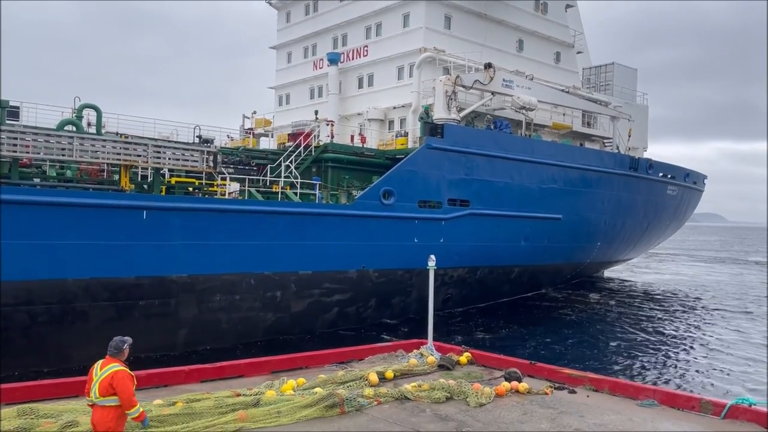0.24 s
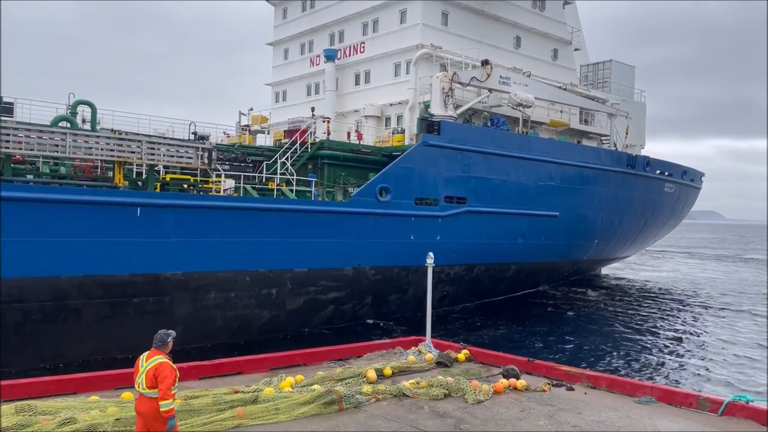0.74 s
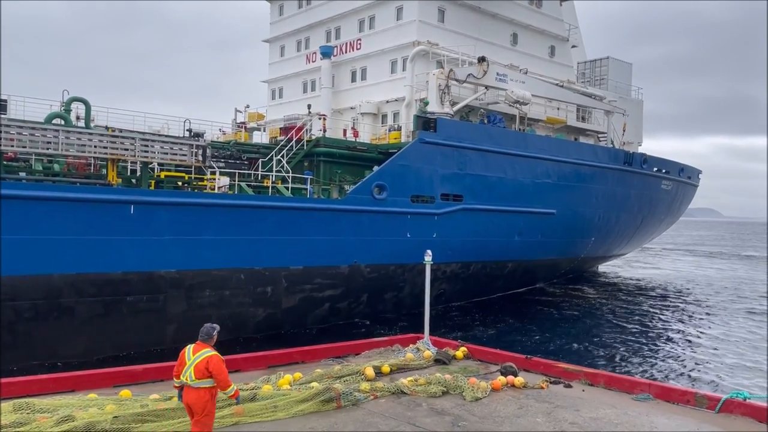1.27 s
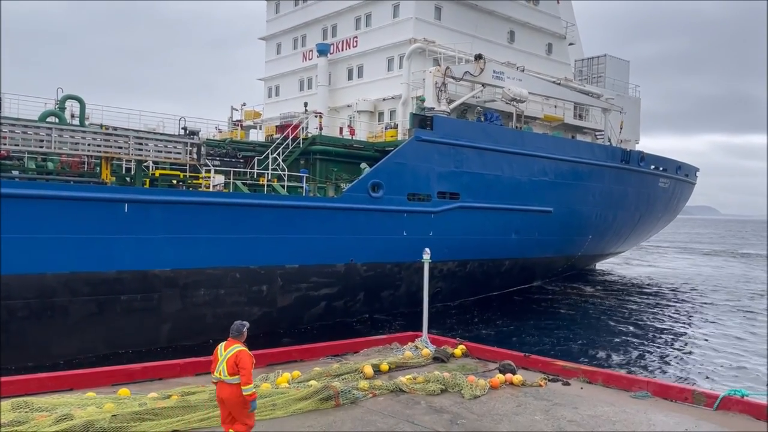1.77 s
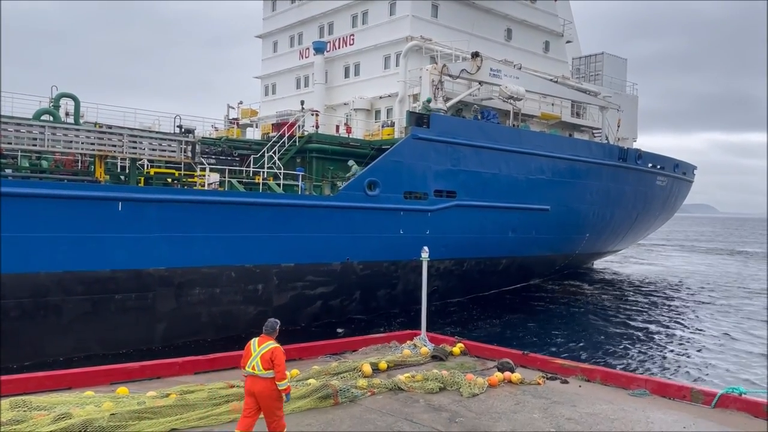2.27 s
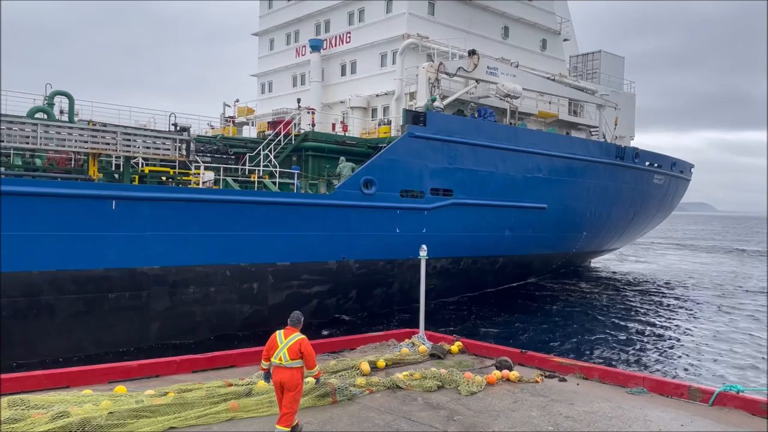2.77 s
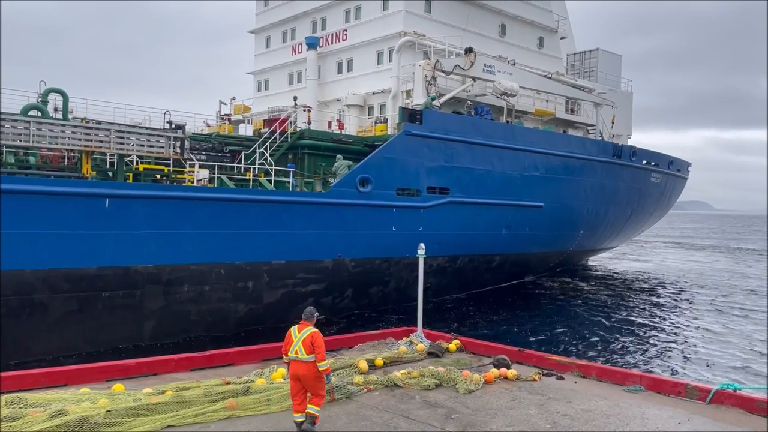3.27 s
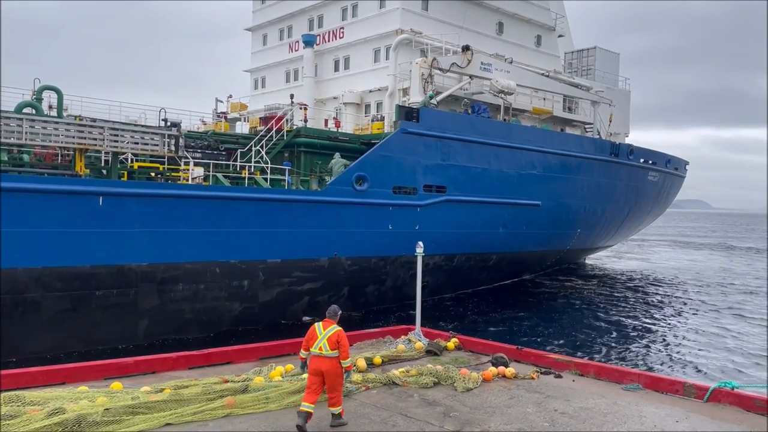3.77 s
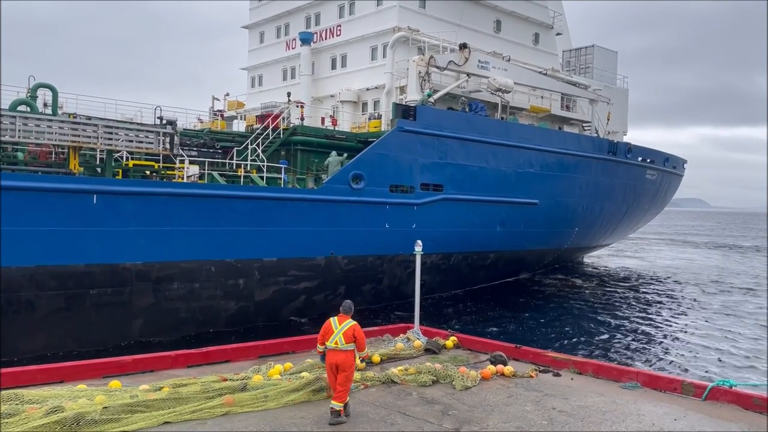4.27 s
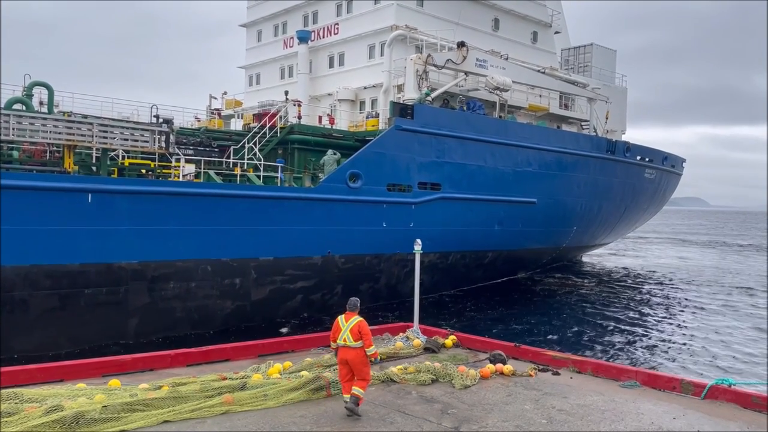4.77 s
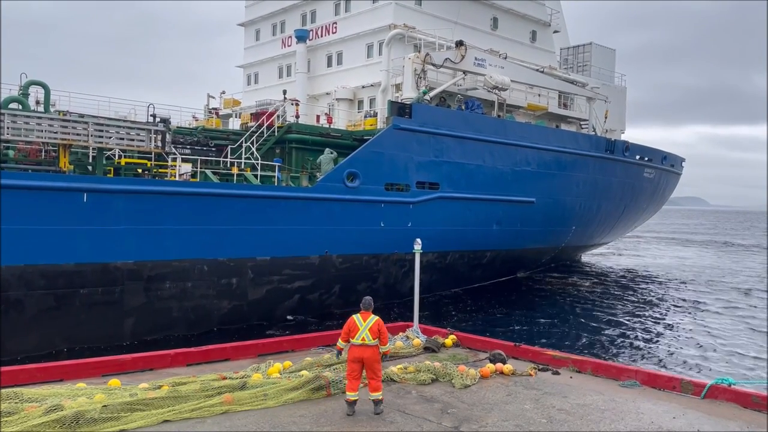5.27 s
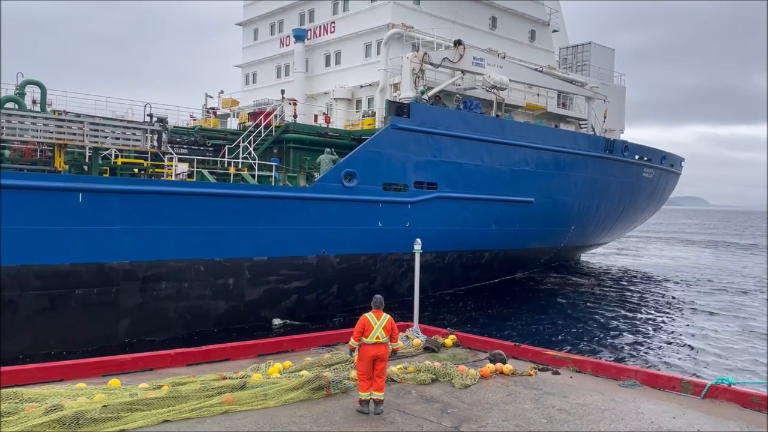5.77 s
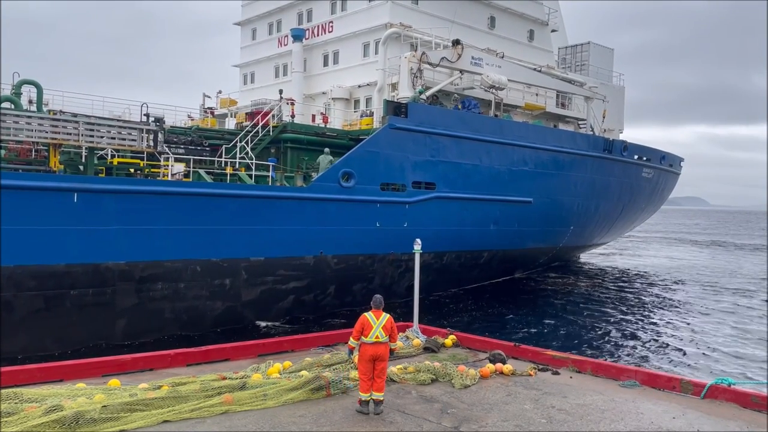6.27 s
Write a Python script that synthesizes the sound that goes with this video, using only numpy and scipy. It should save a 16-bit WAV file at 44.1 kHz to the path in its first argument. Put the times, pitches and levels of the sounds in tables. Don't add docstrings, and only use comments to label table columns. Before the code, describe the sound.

A large moored ship's machinery drones without pause for about 6.5 seconds, heard in stereo from an open concrete wharf. Deep diesel rumble, strongest around 50 to 250 Hz, throbs with rough, uneven puffs and a steady low pump hum near 100 Hz. A hollow exhaust boom around 220 Hz is strong at the start, drops near 0.4, surges around 0.9, sinks deepest at 1.5, recovers by 2 and holds, dips briefly near 4, then surges again at 5.3 and eases at the end. Short irregular lulls make it flutter about four times a second. Steel plates and ducts ring dully in the midrange. Quieter ventilation roar and a faint airy whistle and hiss drift above, lifting slightly around 1 and from 3.4 to 4.1 seconds. Bass is solid and central, highs dim and diffuse. No footsteps or voices.

```python
import sys
import numpy as np
from scipy import signal
from scipy.fft import rfft, irfft, next_fast_len
from scipy.io import wavfile
from scipy.ndimage import uniform_filter1d, map_coordinates

SR = 44100
rng = np.random.default_rng(int(sys.argv[2]) if len(sys.argv) > 2 else 0)


def unload_audio(sound):
    columns = np.transpose(np.atleast_2d(sound))
    steps = np.round(np.clip(columns, -1, 1) * 32767)
    wavfile.write(sys.argv[1], SR, steps.astype(np.int16))


def how_loud(loudness_db):
    steps = np.asarray(loudness_db, float) / 20
    return 10 ** steps


N = 287532
T = np.arange(N) / SR

# time in seconds, level in dB.
BREEZE = [(0, -0.5), (.6, 1), (1.25, 1), (1.8, .5), (2.55, -0.6), (3.4, 1.7), (4.1, 1.6), (4.55, 1),
          (5.4, 1.35), (5.9, 1), (6.52, 0.5)]
BAND_EDGES = (270, 980, 3000, 8200)


def swells(rows, smooth_s):
    curve = np.interp(T, *np.transpose(rows))
    smooth = uniform_filter1d(curve, size=int(smooth_s * SR))
    return smooth - smooth.mean()


def wobble(rate):
    coarse = T[::256]
    points = rng.standard_normal(int(N * rate / SR) + 4)
    return np.interp(T, coarse, map_coordinates(points, [coarse * rate]))


def port_spectrum():
    # frequency in Hz, level in dB per Hz, left-right balance in dB, likeness from 0 to 1,
    # lead of the right port in radians.
    hull_rows = [(25, -66.5, -1, 0.93, 0), (35, -60.5, 4, 0.95, 0.059), (54.3, -49, -0.7, 0.96, 0.071),
                 (80.4, -49.5, 0.6, 0.98, 0.49), (110, -50.5, 0.5, 0.99, 0.13), (145, -54, -2.5, 1, 0),
                 (184, -56, 0.3, 0.93, 0.19), (243, -55.5, -1, 1, 0.22), (337, -64.5, -1, .89, .3),
                 (468, -60.5, -.6, .93, .2), (557, -62, 2.1, 0.9, 0.4), (790, -63, 2.5, .88, 0.98),
                 (888, -63.5, 8.5, 1, 1.4), (961, -64.5, 2, .85, 1.67)]
    fan_rows = [(1080, -65, 4.7, .85, 2.8), (1220, -73.2, .3, .66, 3.5), (1300, -70.6, 1.5, .84, 5.3),
                (1380, -68, -1.5, .93, 6.2), (1500, -70.8, -.3, .8, 6.8), (1600, -71.3, 0, .82, 7.4),
                (1760, -74.5, .7, .7, 7.6), (1890, -74.5, 3.2, .33, 8.8), (1960, -75.2, 2.7, .66, 9.5),
                (2060, -79, 3.3, .54, 9.7), (2220, -78.4, .2, .72, 11.3), (2450, -77, -2.4, .89, 11.7),
                (2750, -81.3, -2, .92, 12.6), (2880, -85, -.5, .82, 12.9)]
    hiss_rows = [(3000, -87.5, 1, .35, 13.4), (3200, -88.5, .5, .55, 16), (3550, -88.5, 0, 0.36, 16.7),
                 (3630, -89.5, 5.5, .11, 15.7), (3760, -87, 1.5, .49, 12.7), (3900, -94, -0.5, .7, 13.1),
                 (4470, -92.5, 2, 0.57, 13.4), (4700, -95, 1.5, .13, 14.5), (4970, -98, 0.5, .18, 14),
                 (5550, -98, 2.7, .49, 15.1), (5930, -99.7, -1.2, .26, 13.7),
                 (6120, -102.7, -1.5, 0.46, 13.6), (7030, -111.8, 2, 0.14, 13), (8600, -127, -1, 0.51, 5.2)]
    return np.transpose(sorted(hull_rows + fan_rows + hiss_rows))


def peaks(modes):
    def gain(hz):
        power = 0
        for centre, width, db in modes:
            power = power + how_loud(db) ** 2 / (1 + (2 * (hz - centre) / width) ** 2) ** 2
        return np.sqrt(power)
    return gain


def broad(low_hz, high_hz):
    f, db = port_spectrum()[:2]

    def gain(hz):
        level_db = np.interp(np.log(hz + 1), np.log(f + 1), db)
        return how_loud(level_db) * (hz >= low_hz) * (hz < high_hz)
    return gain


def at_ports(pair, hz, least_alike):
    f, _, balance_db, alike, lead = port_spectrum()
    likeness = np.clip(np.interp(hz, f, alike), least_alike, 1)
    turn = np.arccos(likeness) / 2
    mid, side = pair[0] * np.cos(turn), pair[1] * np.sin(turn)
    skew = how_loud(np.interp(hz, f, balance_db) / 2) * np.exp(-.5j * np.interp(hz, f, lead))
    return np.array([(mid + side) * skew, (mid - side) / skew])


def roar(gain, patchy_db, least_alike=0):
    z = signal.stft(rng.standard_normal((2, N + 1024)), nperseg=1024)[2]
    field = rng.standard_normal(z.shape[1:])
    for axis in (0, 1):
        field = uniform_filter1d(field, size=10, axis=axis)
    noise = signal.istft(z * how_loud(patchy_db * field / field.std()), nperseg=1024)[1]
    m = next_fast_len(N + 8192)
    hz = np.fft.rfftfreq(m, 1 / SR)
    shaped = rfft(noise / noise.std(), m) * gain(hz) * np.sqrt(SR / 2)
    return irfft(at_ports(shaped, hz, least_alike), m)[:, :N]


def evened(x, share):
    power = np.abs(uniform_filter1d(np.mean(x ** 2, axis=0), size=SR // 25))
    return x * (power / power.mean() + 0.03) ** (-np.clip(share, 0, 1) / 2)


def tones(lines, phases, drift_db, slip):
    total = np.zeros((2, N))
    for (hz, db), start in zip(lines, phases):
        apart = 0.13 * wobble(0.9) * np.array([[1], [-1]])
        phase = 2 * np.pi * hz * T + start + slip * wobble(.8) + apart
        total += np.sqrt(2) * how_loud(db + drift_db * wobble(0.92)) * np.cos(phase)
    return total * how_loud(np.array([[-.3], [.3]]))


def pumps():
    # frequency in Hz, level in dB rms.
    hum_rows = [(101.02, -38), (196.7, -45), (271, -54)]
    return tones(hum_rows, 2 * np.pi * rng.random(len(hum_rows)), drift_db=-2.5, slip=0.48)


def vents():
    # frequency in Hz, width in Hz, level in dB per Hz.
    whistle_rows = [(3760, 170, -95), (4200, 650, -93.5)]
    # frequency in Hz, width in Hz, level in dB per Hz.
    cowl_rows = [(1085, 40, -70), (1388, 50, -70.5), (1660, 70, -75), (1898, 8, -72)]
    fans_follow, whistle_follows = 0.55, 1.4
    breeze_db = swells(BREEZE, smooth_s=.2)
    blades, cowl_ring = broad(*BAND_EDGES[1:3]), peaks(cowl_rows)
    fans = roar(lambda hz: np.hypot(blades(hz), cowl_ring(hz)), patchy_db=0.83)
    hiss = roar(broad(*BAND_EDGES[2:]), patchy_db=1.44)
    whistle = roar(peaks(whistle_rows), patchy_db=3.0)
    return how_loud(fans_follow * breeze_db) * fans + how_loud(breeze_db) * hiss + how_loud(whistle_follows * breeze_db) * whistle


def ringing_plates():
    # frequency in Hz, width in Hz, level in dB per Hz.
    plate_rows = [(299, 20, -55), (431.8, 20, -56.5), (452.2, 9.2, -61), (507.8, 19, -55.5),
                  (515.2, 20, -59.5), (653, 31, -60), (703, 37, -60), (756.5, 48, -60.5),
                  (893.4, 22, -56.5), (920.5, 30, -62.5)]
    breeze_share = .6
    hull = roar(broad(*BAND_EDGES[:2]), patchy_db=.4)
    ring = roar(peaks(plate_rows), patchy_db=.7, least_alike=.96)
    return how_loud(breeze_share * swells(BREEZE, smooth_s=.2)) * (hull + ring)


def trunk_lulls():
    # time in seconds, depth in dB.
    lull_rows = [(.32, 13), (.7, 12), (1.09, 6), (1.28, 9), (1.55, 9), (1.75, 8), (2.01, 17), (2.27, 11),
                 (2.61, 13), (2.84, 6), (3.02, 16), (3.25, 7), (3.65, 13), (4.09, 14), (4.59, 11),
                 (4.83, 13), (5.03, 12), (5.26, 8), (5.62, 7), (6.0, 8), (6.18, 8), (6.47, 8)]
    half_width_s = .036
    lull_db = sum(depth_db * np.exp(-.5 * ((T - s) / half_width_s) ** 2) for s, depth_db in lull_rows)
    return lull_db - lull_db.mean()


def trunk_boom(draught_db, lull_db):
    # frequency in Hz, width in Hz, level in dB per Hz.
    trunk_rows = [(207, 12, -46.5), (211.8, 12, -43.5), (223.3, 11.8, -41), (241.5, 18, -52.5)]
    mean_db, flutter_db = -1.14, 1.3
    boom_db = mean_db + draught_db - lull_db + flutter_db * wobble(18)
    return how_loud(boom_db) * evened(roar(peaks(trunk_rows), patchy_db=0.5), share=0.75)


def exhaust_throb():
    # multiple of the engine cycle, level in dB rms.
    order_rows = [(5, -58), (7, -52), (8, -51), (10, -39), (11, -48), (15, -42), (16, -33), (17, -45),
                  (19, -39), (20, -40), (21, -36), (22, -39), (23, -47), (26, -50), (34, -45), (35, -44),
                  (57, -52), (60, -59)]
    # moment as a share of the cycle, size in dB.
    firing_rows = [(.0276, -2), (.1909, -1.9), (.4126, .9), (.5823, -.4), (.8044, 1.6)]
    cycle_hz = 6.044
    at, size_db = np.transpose(firing_rows)
    phases = [np.angle(np.sum(how_loud(size_db) * np.exp(-2j * np.pi * k * at))) for k, _ in order_rows]
    return tones([(k * cycle_hz, db) for k, db in order_rows], phases, drift_db=1.2, slip=.25)


def engine():
    # time in seconds, level in dB.
    draught_rows = [
        (0, 3),
        (.4, -6.5),
        (.9, 2.5),
        (1.5, -7),
        (1.95, 0.5),
        (3.45, 1.5),
        (3.95, -3),
        (5.3, 2.5),
        (6.1, 2),
        (6.52, -1),
    ]
    draught_share, lull_share, flutter_db = 0.15, 0.12, 2.5
    throb_share = .5
    draught_db, lull_db = swells(draught_rows, smooth_s=.2), trunk_lulls()
    rumble_db = draught_share * draught_db + lull_share * lull_db + flutter_db * wobble(12)
    lowest_hz = 22
    rumble = evened(roar(broad(lowest_hz, BAND_EDGES[0]), patchy_db=-0.3), share=0.81)
    throb = how_loud(throb_share * rumble_db) * exhaust_throb()
    return throb + how_loud(rumble_db) * rumble + trunk_boom(draught_db, lull_db) + ringing_plates()


def scene():
    return pumps() + vents() + engine()


def band_limit(x):
    return signal.sosfilt(signal.butter(12, 12400, fs=SR, output="sos"), x)


def record(dry):
    # frequency in Hz, level in dB per Hz.
    electronics_rows = [(8000, -146), (8800, -141), (9200, -132), (10500, -132), (11100, -140),
                        (12400, -140)]
    mirror_hz = 12000
    mirror = how_loud(-66.0) * dry.mean(0) * np.cos(2 * np.pi * mirror_hz * T)
    hz, db = np.transpose(electronics_rows)
    hiss_gain = how_loud(np.interp(np.fft.rfftfreq(N, 1 / SR), hz, db, left=-160))
    own_hiss = irfft(rfft(rng.standard_normal(N)) * hiss_gain, N) * np.sqrt(SR / 2)
    tick = how_loud(-59.5) * (np.arange(N) == round(4.98 * SR))
    ends = np.sin(np.pi / 2 * np.clip(np.minimum(T, T[::-1]) / .002, 0, 1)) ** 2
    return band_limit(ends * (dry + mirror) + tick + own_hiss)


dry = scene()
out = record(dry)
unload_audio(out)
```